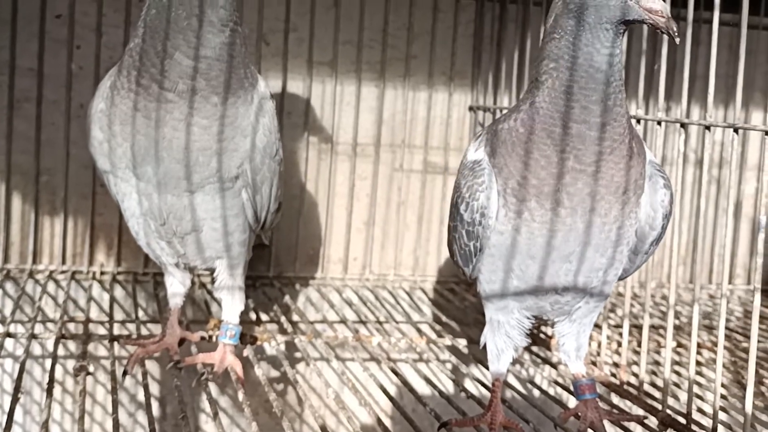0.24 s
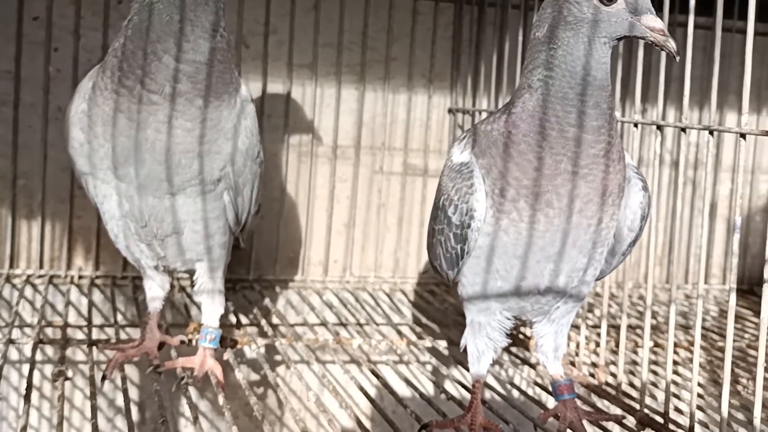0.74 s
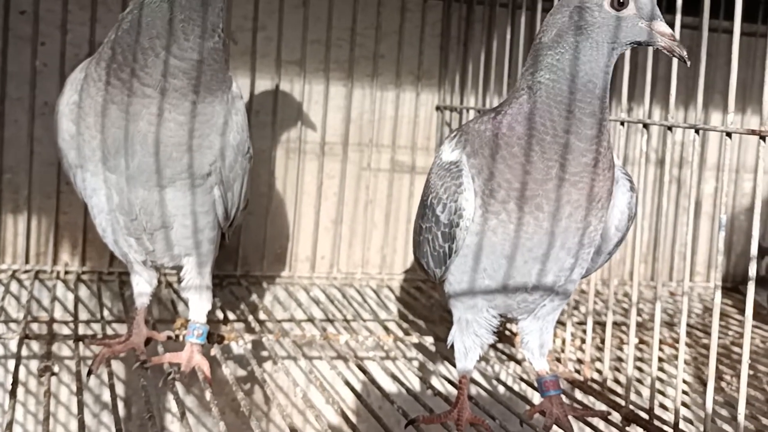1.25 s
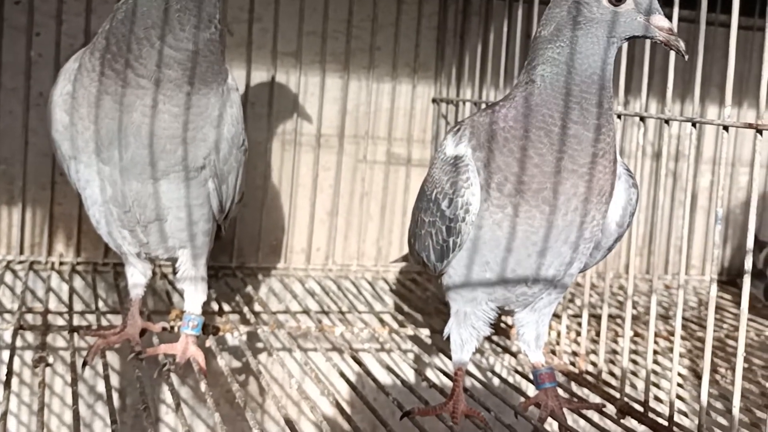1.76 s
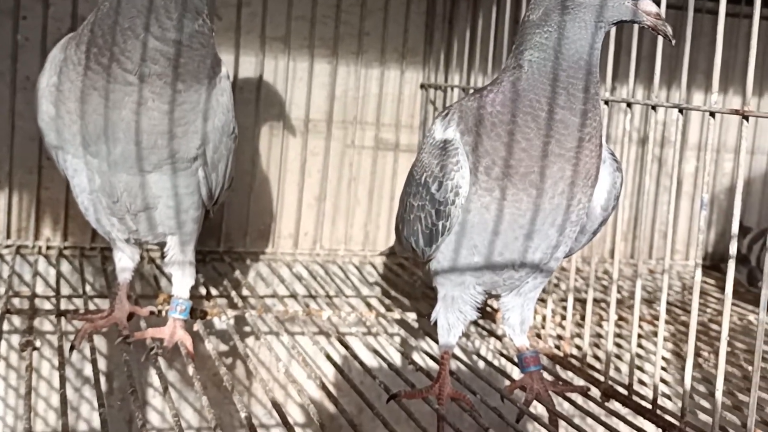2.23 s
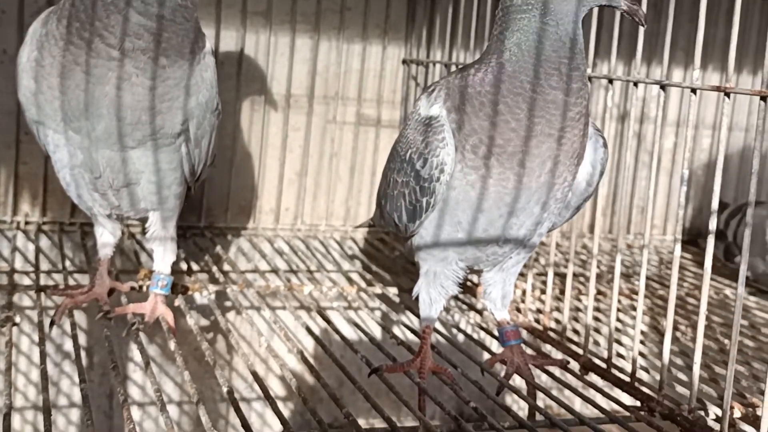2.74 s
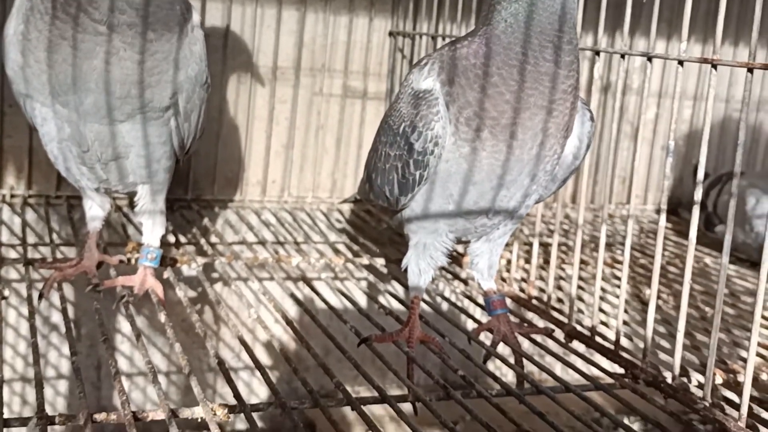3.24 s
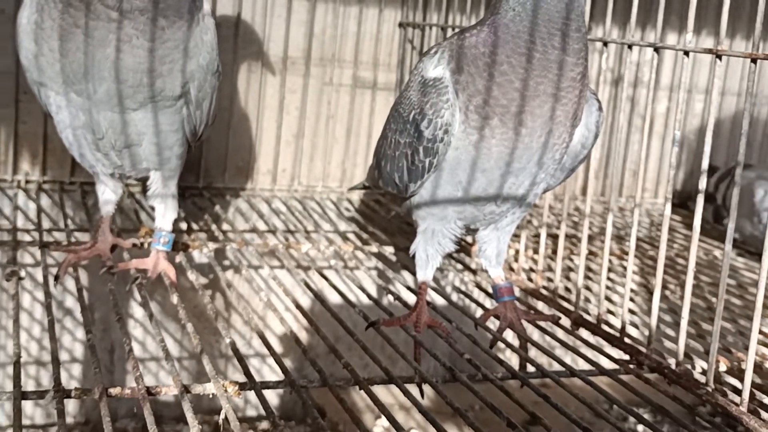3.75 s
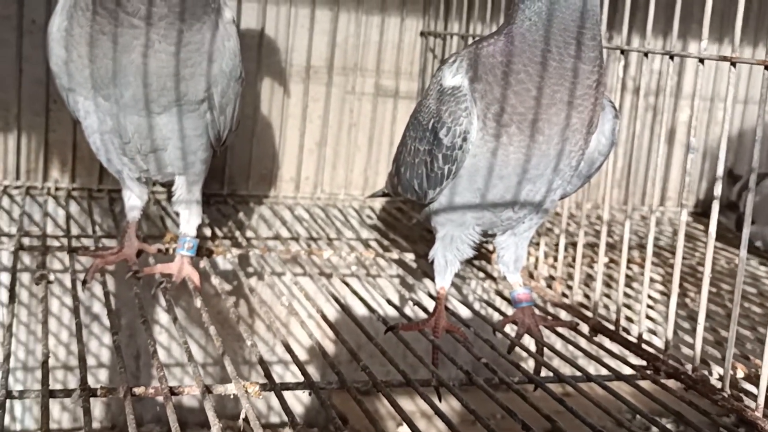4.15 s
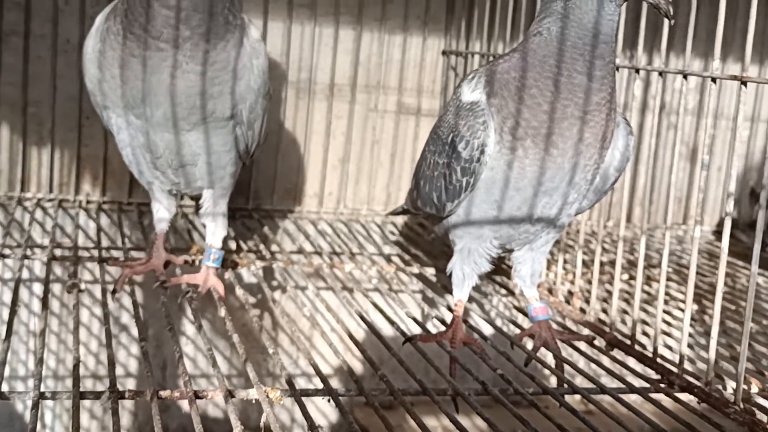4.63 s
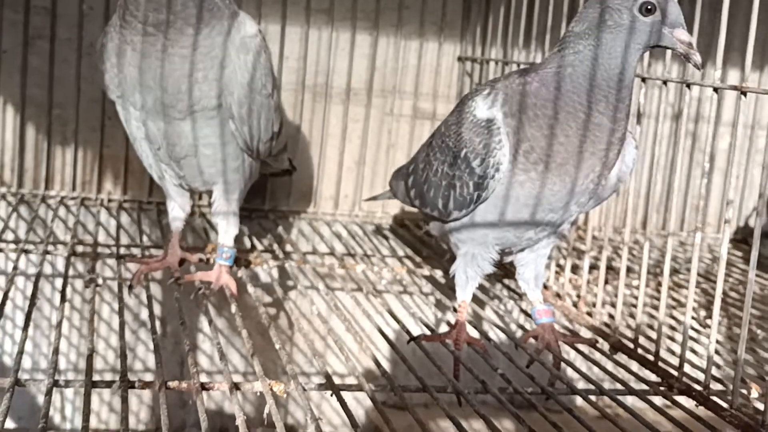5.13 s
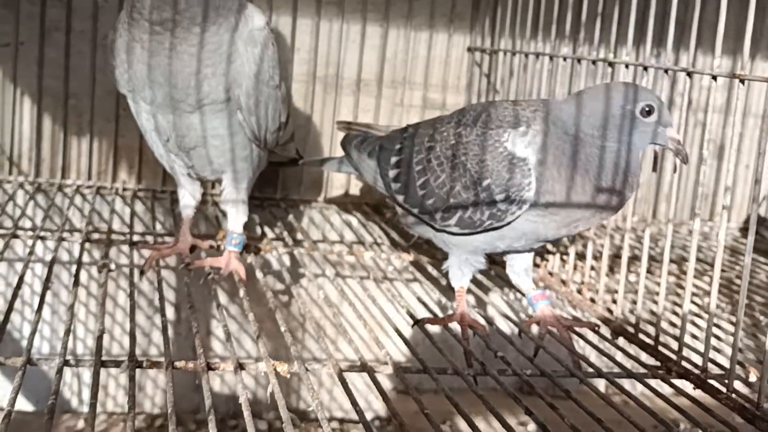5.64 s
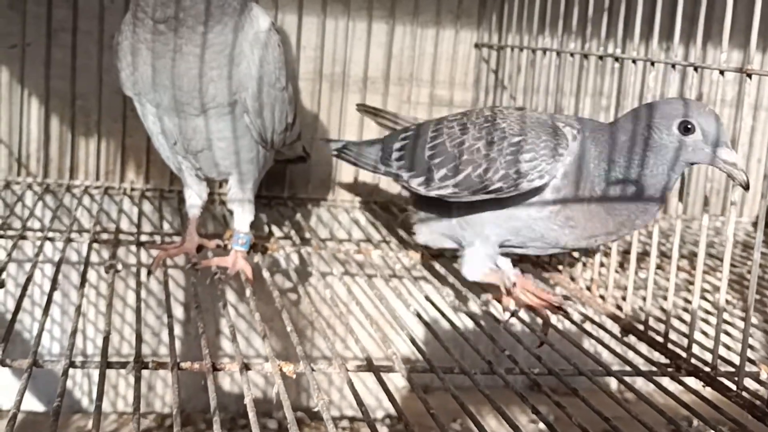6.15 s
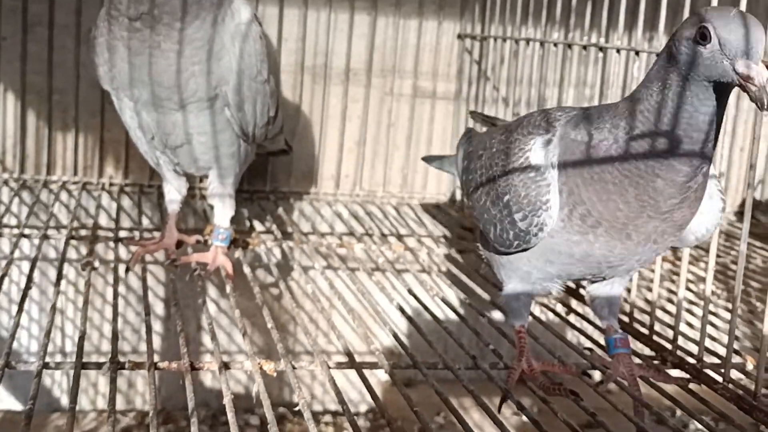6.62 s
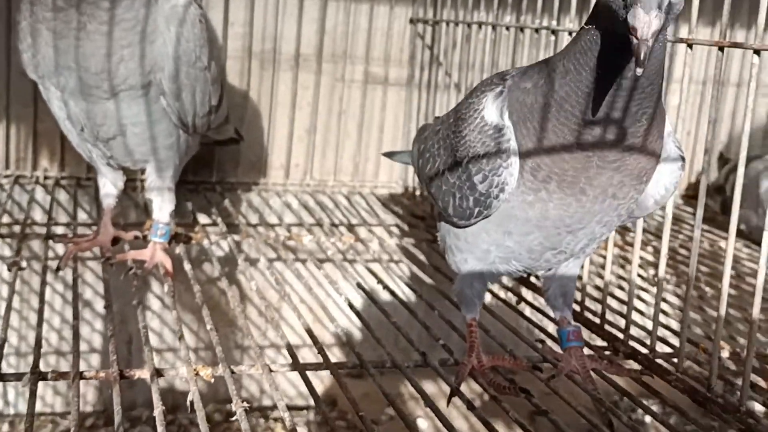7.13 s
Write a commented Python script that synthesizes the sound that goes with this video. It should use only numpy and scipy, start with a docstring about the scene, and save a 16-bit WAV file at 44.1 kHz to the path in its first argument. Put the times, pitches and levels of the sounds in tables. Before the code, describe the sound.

Young pigeons move close to the microphone in a small loft, over a quiet outdoor hum and faint hiss. For the first 1.2 seconds feathers rustle and wings flick and clap, loudest around half a second, while air buffets the microphone and feet thump the wire floor. A faint, thin whistle sinks in pitch until 3 seconds. The birds settle into light shuffles, occasional claw ticks and a few dull knocks, with wheezy begging squeaks scattered between 0.8 and 4 seconds. Two brief coos come near 1 second; soft, husky cooing further back is fullest from 3 to 5 seconds. At about 5.2 seconds a second, gentler flurry brings wingbeats, foot thumps and a sharp claw tick, easing by 5.8 seconds. Shuffles and small wing flicks follow, and faint wheezy squeaks come around 7 seconds.

```python
"""Young pigeons shift about on the wire floor of a small loft, close by, over a quiet outdoor hum.
They open with a flurry: feathers rustle, wings flick and clap, their draught buffets the microphone,
feet thump the grid and claws tick on the wire. It settles to shuffles and a few dull knocks while a thin
whistle sinks away and birds further off squeak and coo, the cooing fullest from 3 to 5 s.
A second flurry follows, then the last shuffles and wheezy begging squeaks."""
import sys
import numpy as np
from scipy import signal
from scipy.fft import rfft, irfft
from scipy.io import wavfile
from scipy.ndimage import map_coordinates

SR = 44100
rng = np.random.default_rng(int(sys.argv[2]) if len(sys.argv) > 2 else 0)


def transcribe(u):
    """Save the signal u as a 16-bit wav file named by the first command-line argument.

    u: samples, shape (n,) or (channels, n), limited to [-1, 1]; the rate is SR.
    q: integer samples, one column per channel.
    """
    v = np.clip(np.atleast_2d(u).T, -1, 1)
    q = np.round(v * 32767).astype(np.int16)
    wavfile.write(sys.argv[1], SR, q)


N = 325458
TIME = np.arange(N) / SR

# Levels in the tables are relative: each layer sets its own trim.
# tone of the outdoor hum: f/Hz, level/dB
HUM_SPECTRUM = [(15, -4), (30, -7), (55, 6.5), (95, -9.5), (175, 0.5), (340, -11), (510, -8), (750, -24.5),
                (1100, -21.5), (1800, -29.5), (2500, -21.5), (5000, -23), (10000, -45), (16000, -73)]
# fader ride on the hum: t/s, level/dB
HUM_RIDE = [(2.3, -51), (2.9, -52.5), (7.38, -54.5)]
# humps in the steady hiss: f/Hz, width/Hz, level/dB
HISS_HUMPS = [(3350, 450, -24), (4100, 770, -7), (6090, 1340, 0), (8680, 950, 0)]
# plumage brushing against plumage and bars: t/s, length/s, level/dB
SHUFFLES = [(0, 0.24, -42.5), (.27, 0.17, -38.5), (0.528, 0.27, -37.5), (1.06, 0.12, -40.5),
            (1.3, 0.23, -45), (1.832, 0.15, -49.5), (2.369, 0.067, -47), (3.6, 0.075, -44.5),
            (3.945, 0.54, -51.5), (4.444, 0.37, -44.5), (5.12, 0.23, -47), (5.37, 0.17, -43.5),
            (5.752, 0.02, -40.5), (5.88, 0.41, -47.5), (6.355, 0.22, -46.5), (6.962, 0.11, -50),
            (7.254, .14, -55.5)]
# wingbeats: t/s, effort/dB, push of air on the microphone/dB
WINGBEATS = [(.005, -1, -45), (0.162, -0.5, -35), (.275, 0, -32), (.385, 1.5, -32), (.497, 1, -33),
             (.6, -2, -28.5), (0.699, 2, -32), (.775, -1, -37), (.95, -3, -52), (1.073, -4, -47),
             (1.19, -6, -48), (5.168, -4.5, -38), (5.255, -4.5, -46), (5.365, -3.5, -40), (5.45, -4, -40)]
# tone of soft feathers sliding: f/Hz, level/dB
PLUMAGE_SPECTRUM = [(300, -8), (1000, 0.5), (1800, -13.5), (2400, -0.5), (3600, 4.5), (5000, 0), (6300, 0),
                    (11000, -0.8), (16000, -7.5)]
# tone of the air a wing pushes: f/Hz, level/dB
WHOOSH_SPECTRUM = [(40, 13.5), (100, -14.5), (185, 6.5), (330, -6.5), (530, 4.5), (700, -6), (830, -9),
                   (1050, -11.5), (2200, -16), (5000, -42)]
# tone of eddies on the microphone: f/Hz, level/dB
EDDY_SPECTRUM = [(12, -23), (29, -25), (42, 4), (65, 12), (120, -22), (300, -52), (1000, -80)]
# tone of stiff quills: f/Hz, level/dB
QUILL_SPECTRUM = [(150, 0), (500, 1), (1100, -3.5), (1800, -7.5), (2300, 1), (3300, 2.5), (6000, 2.5),
                  (8700, -0.5), (10600, -1), (13000, -3), (16000, -10)]
# wing flicks and claps: t/s at the peak, level/dB, rise/s, decay/s, brightness (treble tilt), body/dB
WING_FLICKS = [(.042, -26.5, 0.0028, 0.012, -0.5, -5), (.051, -19, 0.0013, 0.0078, 1, 2),
               (0.152, -26, .003, 0.011, 7, 1), (0.168, -22.5, 0.0013, 0.014, 1.5, 1.5),
               (0.22, -27, 0.002, 0.012, 3, -2), (0.263, -29, 0.0059, 0.0063, 1.5, 0),
               (0.285, -32, .001, 0.0076, 2, 9), (.308, -31, 0.0046, 0.0066, 0, 9),
               (.35, -28.5, .0006, 0.0095, 7, 14), (0.443, -28, 0.026, 0.026, -0.5, -4),
               (0.504, -14.5, 0.002, 0.011, 1, -1.5), (0.603, -27.5, 0.0069, 0.03, 3.5, 5.5),
               (0.652, -14, 0.0036, 0.008, 2, -3), (0.769, -30.5, 0.014, 0.019, 5, 12),
               (0.954, -26.5, .0025, 0.013, 3.5, 6), (0.979, -27.5, 0.001, 0.024, 2.5, -13),
               (1.081, -20.5, 0.005, 0.0059, 5, 3), (1.178, -32.5, 0.008, 0.006, 2.5, -17),
               (1.21, -26, 0.0019, 0.0094, 3.5, 2.5), (1.344, -39, .0015, 0.0093, 4, 6),
               (1.384, -33.5, 0.0013, 0.015, 6, -3), (1.439, -32.5, 0.0015, 0.0078, 3, -41),
               (1.491, -32, 0.004, 0.0072, 0, 2), (1.639, -37, 0.0017, 0.032, 0.5, 3),
               (1.796, -37.5, 0.0028, 0.019, 0, 1), (1.86, -37, 0.0033, 0.011, 2, -3),
               (1.924, -38, 0.0012, 0.018, 3, 0), (2.028, -43, .004, .018, 9, -8),
               (2.409, -35, 0.0015, 0.016, 5, -15), (3.084, -35.5, .0012, 0.019, 6, -2),
               (3.357, -41, 0.0016, 0.026, 0, -5), (3.799, -40, 0.0097, 0.078, -1.5, 1),
               (4.078, -37, .001, 0.01, 4.5, -2), (4.333, -32, 0.016, 0.03, 5.5, -5),
               (4.437, -37.5, 0.0019, 0.0068, 10, 0), (4.791, -39, .0013, 0.015, -4, -6),
               (4.974, -40.5, 0.024, 0.062, 1, 9.5), (5.068, -38, 0.0078, 0.025, 0.5, 11),
               (5.118, -38.5, 0.016, 0.0089, 4, 9), (5.208, -36, 0.031, 0.023, 3, 15.5),
               (5.26, -31, 0.0031, 0.036, 0, 0), (5.368, -29.5, 0.006, 0.037, 0, 7),
               (5.401, -26.5, 0.0039, 0.034, 2, 6), (5.469, -24.5, 0.0009, 0.033, 5.5, 0.5),
               (5.587, -40, 0.0026, 0.04, 1.5, 13), (5.731, -39, 0.0082, 0.035, 3, 3.5),
               (6.046, -29.5, .0006, 0.015, 4.5, -18), (6.35, -36, 0.0057, 0.017, 2.5, 3.5),
               (6.499, -28, 0.006, 0.018, 3, -14), (6.644, -29.5, 0.00093, 0.023, 6, -3.5),
               (6.798, -36, 0.0037, 0.023, 6.5, 2.5)]
# feet landing on the grid: t/s, level/dB, hardness/(dB per octave), scuff decay/s
FOOTFALLS = [(.167, -30, 4, 0.0021), (0.28, -33, 3, 0.0034), (.4, -31, 16, 0.014), (.504, -22.5, 4, 0.0024),
             (0.601, -28.5, -0.5, 0.0035), (.627, -30.5, 27, 0.0065), (5.18, -32.5, -6.5, 0.03),
             (5.276, -31, -9, 0.019), (5.391, -27.5, -0.5, 0.015), (5.498, -23, -15, 0.0028),
             (5.585, -37.5, 3, 0.0044), (5.768, -37.5, 7, 0.0077), (6.632, -38, 0, 0.0054)]
# modes of the wire grid on its wooden frame: f/Hz, level/dB, t60/s
GRID_MODES = [(54.5, -18, 0.083), (140, 0, 0.08), (174, 1, 0.23), (213.4, 7, 0.079), (300, -11, 0.037),
              (424, -11.5, 0.11), (545, 3.5, 0.079), (606, -12, .07), (835, -11.5, 0.16)]
# claws catching a wire: t/s, level/dB
CLAW_TICKS = [(.3485, -24), (1.858, -25), (1.9235, -42), (2.408, -30), (3.356, -38), (4.0772, -46),
              (5.469, -19), (6.0455, -26)]
# begging notes: t/s, length/s, start f/Hz, end f/Hz, width/Hz, level/dB, loudest point/share of length
SQUEAKS = [(0.841, 0.081, 3870, 4100, 896, -43.5, 0.34), (1.577, 0.24, 1820, 2134, 380, -60, 0.37),
           (1.859, 0.22, 3195, 2810, 696, -47, 0.32), (2.162, 0.11, 2710, 3170, 447, -49, 0.42),
           (2.297, 0.16, 4090, 3894, 656, -48.5, 0.53), (3.142, 0.19, 3420, 3350, 109, -55, 0.08),
           (3.61, 0.084, 3440, 3400, 160, -48.5, 0.27), (3.948, 0.071, 3670, 3980, 1516, -48.5, 0.28),
           (6.822, 0.12, 2180, 2660, 300, -60, 0.41), (6.944, 0.35, 3600, 3575, 1800, -54, 0.25)]
# short dull knocks close by: t/s, level/dB
KNOCKS = [(0.852, -32.5), (2.084, -39), (2.339, -40), (2.803, -37), (4.806, -41)]
# syllables of cooing: t/s, length/s, f/Hz, level/dB, octave overtone/dB
COO_SYLLABLES = [(.975, 0.064, 522, -42, -22), (1.153, 0.11, 538.7, -49, -28),
                 (3.19, 0.15, 486.4, -61.5, -6.5), (3.33, 0.13, 483.6, -53, -8),
                 (3.46, 0.18, 512, -52, -20), (3.61, 0.19, 517, -56.5, -26), (3.94, 0.1, 547, -60.5, 0.5),
                 (4.03, 0.099, 543, -58.5, 1), (4.14, 0.084, 545, -63, 5), (4.24, 0.071, 536, -50, -8),
                 (4.48, 0.15, 539, -60, -.5), (4.655, 0.11, 543, -51.5, -5),
                 (4.895, 0.062, 470, -45.5, -12), (4.99, 0.11, 497, -54.5, -20)]


def undb(db):
    """Decibels to gain."""
    return 10 ** (np.asarray(db) / 20)


def unit(x):
    """Scale to rms 1."""
    return x / np.sqrt(np.mean(x ** 2))


def freqs(x):
    """Frequencies of the spectrum of x, floored at 1 Hz."""
    return np.maximum(np.fft.rfftfreq(x.shape[-1], 1 / SR), 1)


def eq(x, db):
    """Apply one gain to each frequency."""
    return irfft(rfft(x) * undb(db), x.shape[-1])


def colour(x, spectrum):
    """EQ x along a curve of f/Hz, level/dB points, at rms 1."""
    hz, db = np.transpose(spectrum)
    return unit(eq(x, np.interp(np.log(freqs(x)), np.log(hz), db)))


def wander(size, rate):
    """Smooth random drift, spread about 1, that changes about rate times a second."""
    place = np.arange(size) * rate / SR
    return map_coordinates(rng.standard_normal(int(place[-1]) + 2), [place], order=3, mode="nearest")


def add(out, s, x):
    """Mix x into out from time s."""
    start = int(s * SR)
    a, b = max(start, 0), min(start + x.shape[-1], N)
    out[:, a:b] += x[..., a - start:b - start]


def gate(start, length, attack_s, release_s):
    """Rise, hold until the length is up, then die away."""
    age = TIME - start
    return np.clip(age / attack_s, 0, 1) * np.exp(-np.maximum(age - length, 0) / release_s)


def arch(length, peak=0.36):
    """Progress 0-1 through a call and its envelope, loudest at the given share of the length."""
    progress = np.linspace(0, 1, int(length * SR))
    return progress, np.sin(np.pi * np.interp(progress, [0, peak, 1], [0, .5, 1]))


def hoarse(hz, width_hz):
    """A breathy tone following hz: strength and phase scatter, differently in each channel."""
    scatter = np.array([wander(len(hz), width_hz) + 1j * wander(len(hz), width_hz) for _ in range(2)])
    return unit(np.real(scatter * np.exp(2j * np.pi * np.cumsum(hz) / SR)))


def outdoor_bed(hiss_db=-56.5):
    """A low outdoor hum under a smooth hiss with a few broad humps."""
    ride_db = np.interp(TIME, *np.transpose(HUM_RIDE))
    hum = colour(rng.standard_normal((2, N)), HUM_SPECTRUM) * undb(ride_db)
    humps = sum(undb(db) / (1 + (2 * (freqs(hum) - hz) / width) ** 4) for hz, width, db in HISS_HUMPS)
    hiss = unit(eq(rng.standard_normal((2, N)), 20 * np.log10(humps)))
    return hum + undb(hiss_db) * hiss


def shuffling(attack_s=0.0069, release_s=0.12, fidget_db=-55.5):
    """How hard the plumage is rubbed: separate shuffles from birds that are never quite still."""
    power = sum((undb(db) * gate(s, length, attack_s, release_s)) ** 2 for s, length, db in SHUFFLES)
    return np.sqrt(power + undb(fidget_db) ** 2)


def flapping(attack_s=0.0079, hold_s=0.036, release_s=0.14):
    """Effort of the wings: each beat swells, holds through the downstroke and fades."""
    power = sum((undb(db) * gate(s, hold_s, attack_s, release_s)) ** 2 for s, db, _ in WINGBEATS)
    return np.sqrt(power)


def barbs(size, grain_db, slip_db, slip_rate):
    """Feather barbs snapping past each other: dense clicks of uneven size, bunched into slips."""
    clicks = rng.standard_normal((2, size)) * undb(grain_db * np.minimum(rng.exponential(size=size), 5))
    return unit(clicks * undb(slip_db * wander(size, slip_rate)))


def rustle(rub, effort, shuffle_db=-1.0, wing_db=-44, jerk_db=1.53):
    """Feathers slide in small uneven jerks, whether a bird shuffles or flaps."""
    feathers = colour(barbs(N, grain_db=1.4, slip_db=2.0, slip_rate=140), PLUMAGE_SPECTRUM)
    movement = np.hypot(rub * undb(shuffle_db), effort * undb(wing_db))
    return feathers * movement * undb(jerk_db * wander(N, 40))


def wing_whoosh(rub, effort, wing_db=-42, shuffle_db=-12, flutter_db=2, band_db=2.5, band_octaves=0.31):
    """Wings push air: a soft whoosh whose box resonances come and go."""
    air = colour(rng.standard_normal((2, N)), WHOOSH_SPECTRUM)
    octave, spectrum = np.log2(freqs(air) / 100), rfft(air)
    bands = (irfft(spectrum * np.exp(-((octave - centre) / band_octaves) ** 2), N)
             for centre in np.linspace(-1, 5, 16))  # 50 to 3200 Hz
    whoosh = unit(sum(band * undb(band_db * wander(N, 35)) for band in bands))
    push = np.hypot(effort * undb(wing_db), rub * undb(shuffle_db))
    return whoosh * push * undb(flutter_db * wander(N, 45))


def draught(eddy_db=-12, wave_hz=28, length_s=0.12, scatter=0.13):
    """Each downstroke sends a slow pressure wave and a few eddies over the microphone."""
    out, progress = np.zeros((2, N)), np.linspace(0, 1, int(length_s * SR))
    eddies = colour(rng.standard_normal((2, N)), EDDY_SPECTRUM) * undb(eddy_db)
    for s, _, db in WINGBEATS:
        hz = wave_hz * (1 + scatter * rng.standard_normal())
        wave = np.array([[1], [0]]) * np.sin(2 * np.pi * hz * length_s * progress)  # mid only
        start = int(s * SR)
        gust = wave + eddies[:, start:start + len(progress)]
        add(out, s, gust * np.sin(np.pi * progress) * undb(db))
    return out


def quill_crackle(effort, per_s=60, size_db=3.0, decay_s=0.0033, trim_db=-47):
    """Stiff quills catch and let go while the wings beat: small crisp snaps within the rustle."""
    snaps = (rng.random(N) < per_s / SR) * undb(size_db * np.minimum(rng.exponential(size=N), 2))
    envelope = signal.lfilter([1], [1, -np.exp(-1 / (decay_s * SR))], snaps + 1e-18)
    quills = colour(rng.standard_normal((2, N)), QUILL_SPECTRUM)
    return unit(quills * envelope) * effort * undb(trim_db)


def wing_flicks(patchy_db=2.5, patch_hz=170, snap_db=-2, snap_s=0.00061, trim_db=-1.73,
                crisp_db=3.0, crisp_share=0.63, blunt=0.22):
    """Strokes swell as quills meet and die as they part; quick ones snap, broad ones sound hollow."""
    out, size = np.zeros((2, N)), 16384
    t = (np.arange(size) - size // 4) / SR  # zero at the peak
    for s, db, rise, decay, brightness, body_db in WING_FLICKS:
        quills = colour(barbs(size, grain_db=2.0, slip_db=-1.0, slip_rate=230), QUILL_SPECTRUM)
        f = freqs(quills)
        tilt = brightness * np.clip(np.log2(f / 6500) / 0.58, -.8, .6)
        body = body_db / (1 + (f / 2000) ** 4)
        # each pose of the wing among the walls favours other frequencies
        patches = patchy_db * np.interp(f / patch_hz, np.arange(400), rng.standard_normal(400))
        quills = unit(eq(quills, tilt + body + patches))
        # the top is crisp at the moment of contact and fades first
        top = eq(quills, -20 * np.log10(1 + (8000 / f) ** 4))
        fade = np.hypot(t / np.where(t < 0, rise, decay), blunt) - blunt
        stroke = (quills - top) * np.exp(-fade) + undb(crisp_db) * top * np.exp(-fade / crisp_share)
        snap = quills * undb(snap_db) * np.exp(-(np.abs(t) + rise / 2) / snap_s)
        add(out, s + t[0], (stroke + snap) * undb(db + trim_db))
    return out


def footfalls(scuff_db=-19, detune=0.015):
    """A foot strikes and scuffs the grid; a hard claw rings the upper modes, a soft landing the low."""
    out, t = np.zeros((2, N)), TIME[:SR // 3]
    for s, db, hardness, scuff_s in FOOTFALLS:
        ring = np.zeros(len(t))
        for hz, mode_db, t60 in GRID_MODES:
            envelope = undb(mode_db + hardness * np.log2(hz / 200) - 60 * t / t60)
            ring += envelope * np.sin(2 * np.pi * hz * t * (1 + detune * rng.standard_normal()))
        strike = t == 0
        scuff = undb(scuff_db) * rng.standard_normal((2, len(t))) * np.exp(-t / scuff_s)
        thump = signal.fftconvolve(strike + scuff, ring[None], axes=1)
        add(out, s, undb(db) * thump / np.abs(thump).max(axis=1, keepdims=True))
    return out


def far_whistle(start_s=0.25, end_s=3.05, start_hz=3330, sag_hz_per_s=340, level_db=-55,
                fade_db_per_s=2.5):
    """A thin, hoarse far whistle that sinks and fades slowly."""
    age = TIME - start_s
    tone = hoarse(start_hz - sag_hz_per_s * age, width_hz=200)
    envelope = gate(start_s, end_s - start_s, attack_s=0.27, release_s=0.033)
    return tone * envelope * undb(level_db - fade_db_per_s * age + 3.0 * wander(N, 22))


def claw_ticks(decay_s=0.001, low_cut_hz=6500, trim_db=1):
    """A claw slips off a wire with a dry, very short tick in the high treble."""
    out, t = np.zeros((2, N)), TIME[:SR // 40]
    for s, db in CLAW_TICKS:
        noise = rng.standard_normal((2, len(t)))
        treble = unit(eq(noise, -20 * np.log10(1 + (low_cut_hz / freqs(noise)) ** 2)))
        add(out, s, treble * np.exp(-t / decay_s) * undb(db + trim_db))
    return out


def squeaks(trim_db=-2.5, core_db=-6, core_share=0.35):
    """Begging notes of young birds: a thin whistle inside a wheeze, gliding and levelling off."""
    out = np.zeros((2, N))
    for s, length, start_hz, end_hz, width_hz, db, peak in SQUEAKS:
        progress, swell = arch(length, peak)
        hz = start_hz + (end_hz - start_hz) * np.sin(np.pi * progress / 2)
        wheeze = hoarse(hz, width_hz)
        core = undb(core_db) * hoarse(hz, core_share * width_hz)
        add(out, s, (wheeze + core) * swell * undb(db + trim_db))
    return out


def knocks(hz=460, decay_s=0.0025):
    """A cycle or two of a heavily damped body, dead centre."""
    out, t = np.zeros((2, N)), TIME[:SR // 20]
    knock = np.array([[1], [0]]) * np.sin(2 * np.pi * hz * t) * np.exp(1 / 2 - t / decay_s)  # mid only
    for s, db in KNOCKS:
        add(out, s, undb(db) * knock)
    return out


def coos(jitter=0.013, sag=0.027, flutter_db=3.5, trim_db=-1.0, husk_db=-7, husk_hz=90):
    """A husky throat tone with its octave, slightly unsteady and sagging towards its end."""
    out = np.zeros((2, N))
    for s, length, pitch_hz, db, octave_db in COO_SYLLABLES:
        progress, swell = arch(length)
        hz = pitch_hz * (1 + sag * (1 / 4 - progress ** 2) + jitter * wander(len(progress), 108))
        phase = 2 * np.pi * np.cumsum(hz) / SR
        tone = np.sqrt(2) * (np.sin(phase) + undb(octave_db) * np.sin(2 * phase))
        husk = undb(husk_db) * (hoarse(hz, husk_hz) + undb(octave_db) * hoarse(2 * hz, husk_hz))
        gain = undb(db + trim_db + flutter_db * wander(len(progress), 56))
        add(out, s, (tone + husk) * swell ** 0.63 * gain)
    return out


def far_cooing(start_s=2.7, length_s=2.23, pitch_hz=545.0, level_db=-58):
    """Birds at the back of the loft coo too, blurred into one wavering band."""
    band = hoarse(np.full(N, pitch_hz), width_hz=190)
    envelope = gate(start_s, length_s, attack_s=0.68, release_s=0.086)
    return band * envelope * undb(level_db + 2 * wander(N, 15))


def loft(x, wet_db, t60):
    """Close boards return a short dense echo, a little dulled on top."""
    t = TIME[:SR // 2]
    echo = rng.standard_normal((2, len(t))) * undb(-60 * t / t60) * (t > .004)  # 4 ms pre-delay
    echo = eq(echo, -10 * np.log10(1 + (freqs(echo) / 9000) ** 2))
    wet = signal.fftconvolve(x, unit(echo) / np.sqrt(len(t)), axes=1)[:, :N]
    return x + undb(wet_db) * wet


def mic_ports(mid_side, spacing_m=0.19):
    """Mid and side to left and right at two spaced ports: alike in the bass, unrelated in the treble."""
    likeness = np.sinc(2 * freqs(mid_side) * spacing_m / 343)  # sound travels at 343 m/s
    mid, side = irfft(rfft(mid_side) * np.sqrt([(1 + likeness) / 2, (1 - likeness) / 2]), N)
    return np.array([mid + side, mid - side])


def scene(coo_pan_db=2.5):
    """Feathers and feet up front, nearly dry; calls deeper in the loft, the coos a little to the right."""
    rub, effort = shuffling(), flapping()
    foley = (wing_flicks() + claw_ticks() + rustle(rub, effort) + quill_crackle(effort)
             + wing_whoosh(rub, effort) + footfalls() + knocks())
    near = loft(foley, wet_db=-14, t60=0.2)
    cooing = loft(coos(), wet_db=-7, t60=0.43) * undb([[-coo_pan_db], [coo_pan_db]])
    begging = loft(squeaks(), wet_db=-2, t60=0.3)
    return mic_ports(near + draught() + outdoor_bed() + far_whistle() + far_cooing()) + cooing + begging


def record(dry, lean_db=3.5, notch_db=-5, notch_hz=10300, notch_width_hz=1500, top_hz=15450):
    """The left port hears more treble and the right one has a notch; the top is cut off."""
    f = freqs(dry)
    lean = lean_db / (1 + (3300 / f) ** 3)
    notch = notch_db / (1 + (2 * (f - notch_hz) / notch_width_hz) ** 2)
    coloured = eq(dry, [lean / 2, notch - lean / 2])
    return signal.sosfilt(signal.ellip(10, .2, 70, top_hz, fs=SR, output="sos"), coloured)


dry = scene()
out = record(dry)
transcribe(out)
```